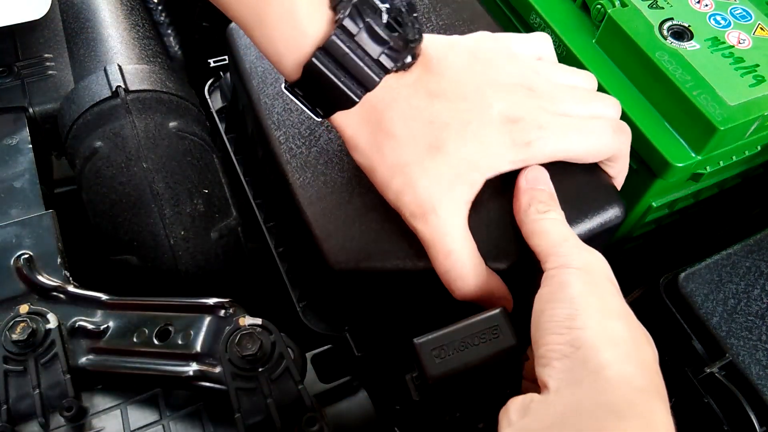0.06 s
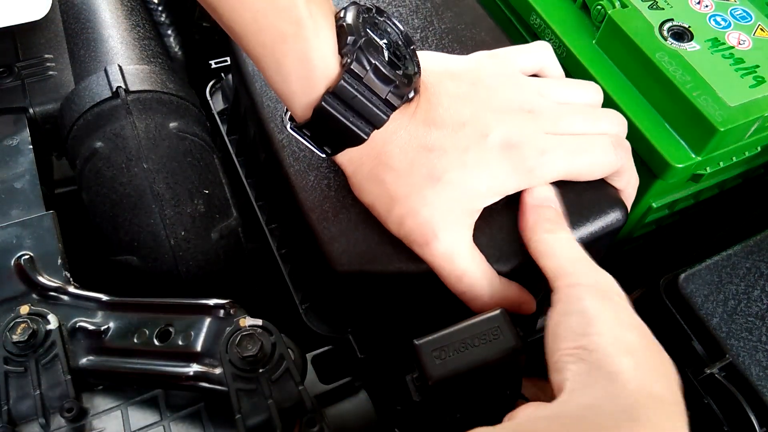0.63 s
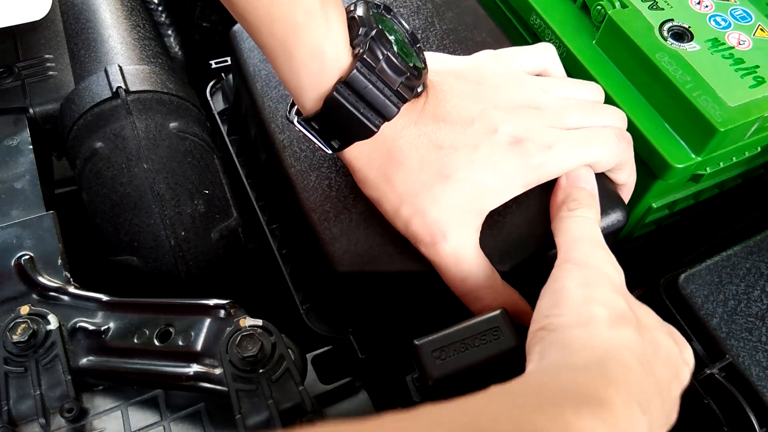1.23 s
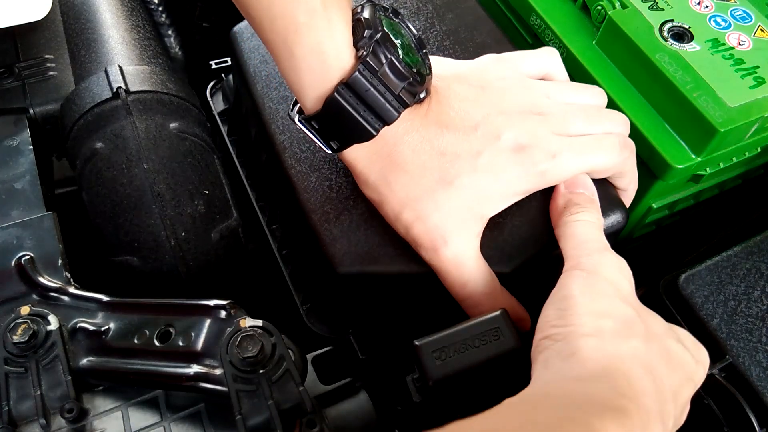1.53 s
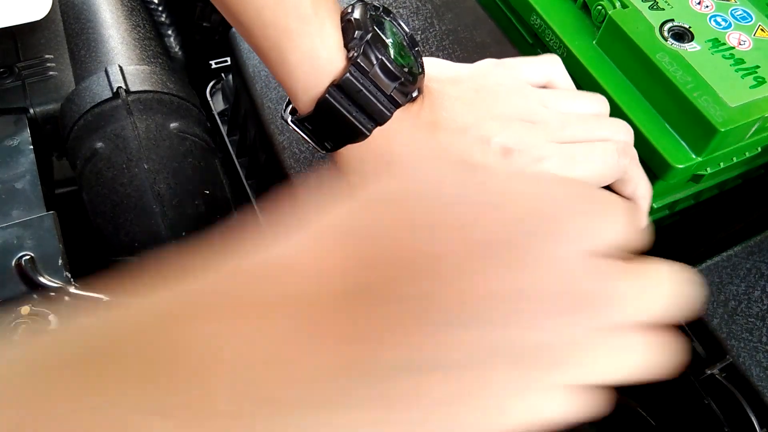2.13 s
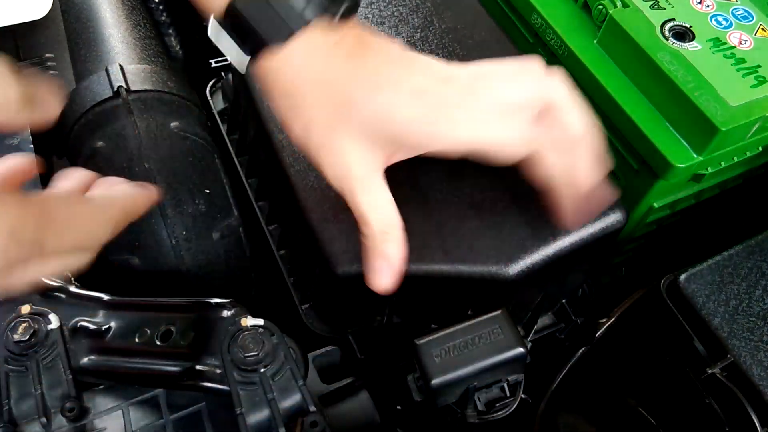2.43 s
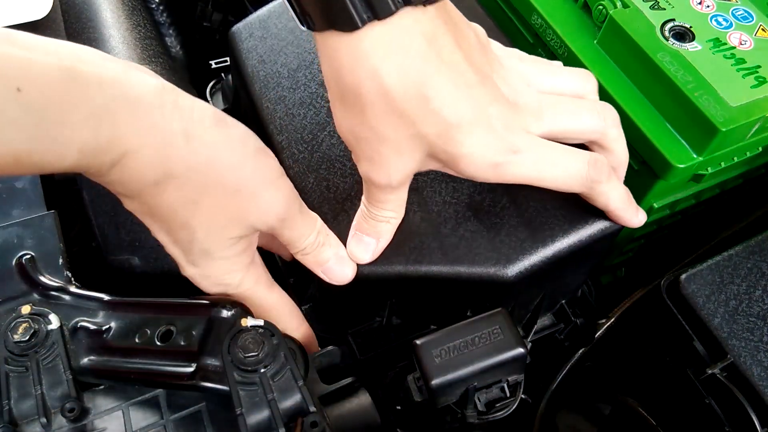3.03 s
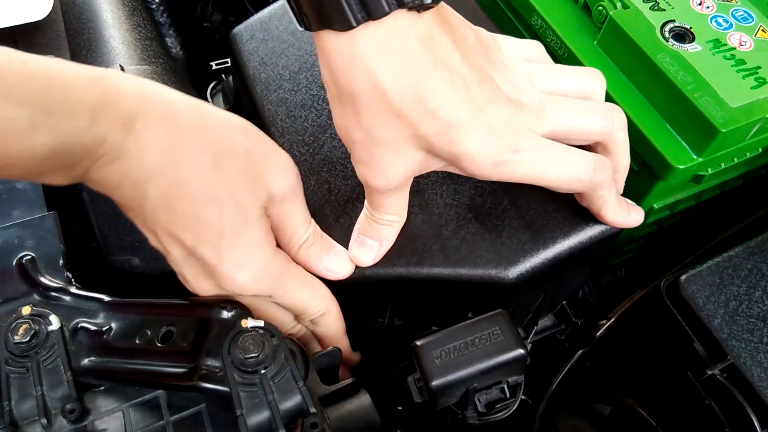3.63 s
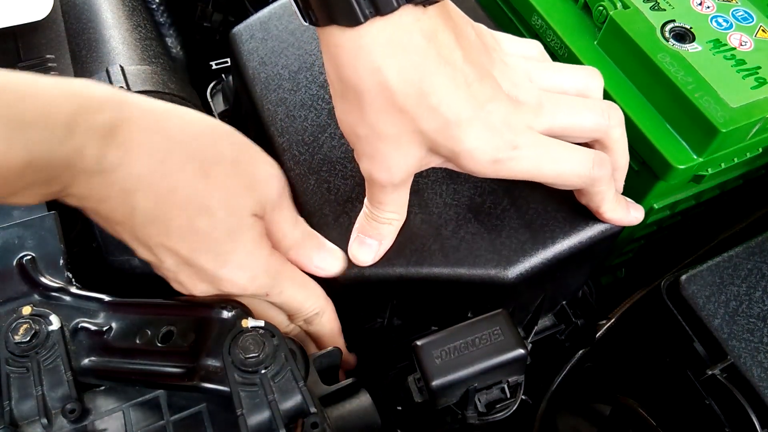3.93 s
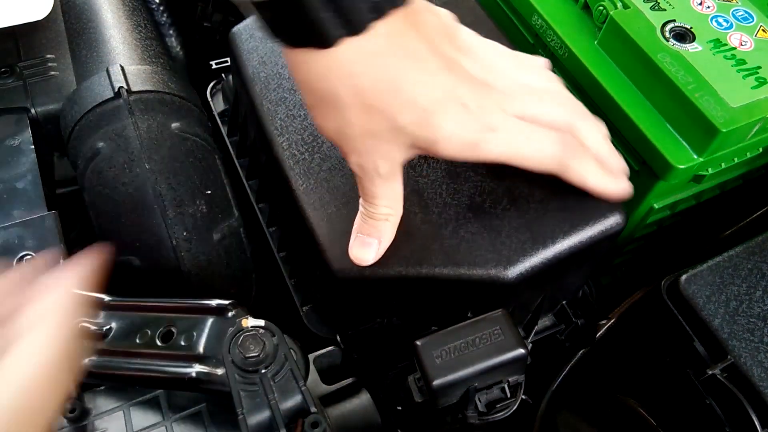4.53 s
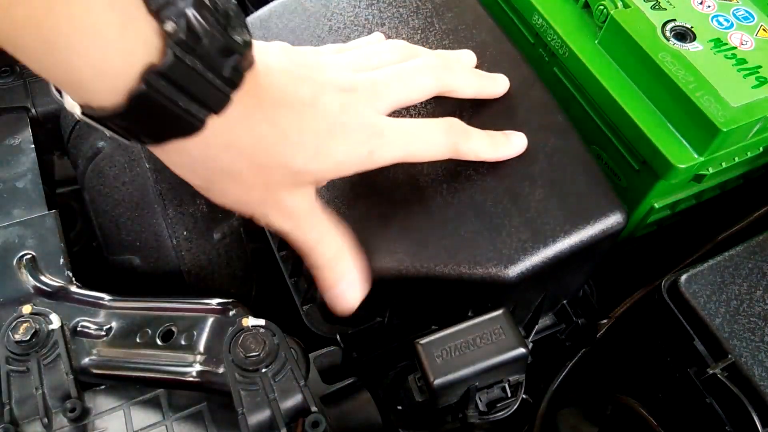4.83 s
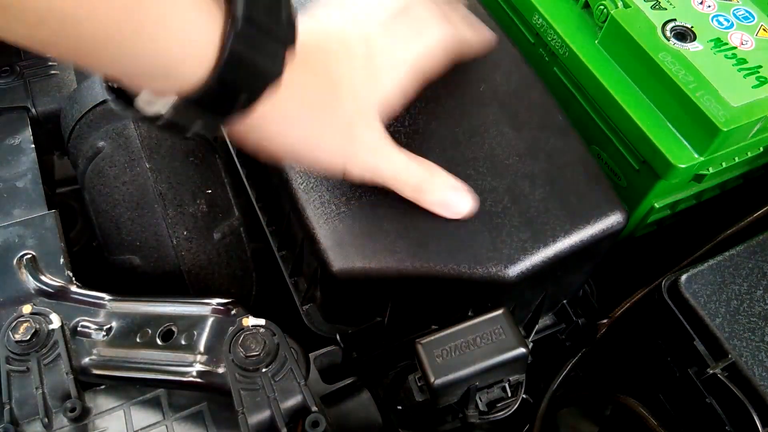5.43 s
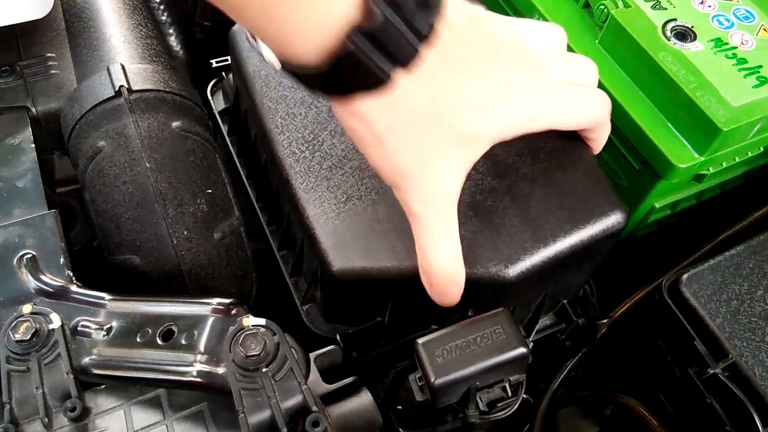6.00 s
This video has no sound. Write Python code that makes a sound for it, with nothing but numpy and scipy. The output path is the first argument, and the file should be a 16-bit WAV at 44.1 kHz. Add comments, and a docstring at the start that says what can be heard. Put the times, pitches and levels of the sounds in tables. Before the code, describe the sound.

A plastic air filter lid is pressed onto its box close to the microphone, in a sheltered parking place. Distant traffic hums quietly throughout, and faint birds whistle short gliding notes, mostly in the first half. Around 1 second the lid settles with a cluster of light knocks, a scrape and a tiny metallic ring. At about 1.8 seconds a steel spring clip snaps shut, loud and sharp, with a hollow plastic knock that slightly overloads and an echo cut short. A soft scrape and knock follow near 2.3 seconds, then a crisp click at 3.1. At 3.7 seconds the second clip snaps shut, just as loud. From about 4 to 4.4 seconds come faint scraping, light knocks and a brief, high twang of the clip. Palms hiss very faintly over the plastic now and then, and one soft tap comes near 6.2 seconds.

```python
"""A plastic air filter lid knocks and rings as two hands press it onto its box, close to a microphone.
Its two spring clips scrape over the rim, twang and snap shut, and palms hiss as they slide over it.
Birds whistle and traffic hums far off, beyond the sheltered parking place.
The two big snaps overload the recorder, whose noise gate cuts their echo short."""
import sys
import numpy as np
from scipy import signal
from scipy.fft import rfft, irfft, next_fast_len
from scipy.io import wavfile
from scipy.ndimage import uniform_filter1d, map_coordinates

SR = 44100
rng = np.random.default_rng(int(sys.argv[2]) if len(sys.argv) > 2 else 0)


def digitize_waveform(pressure):
    """Quantize a signal to 16-bit integers and store it at the path in sys.argv[1].

    Rows of a 2-D input are taken as channels; values are limited to [-1, 1].
    """
    field = np.atleast_2d(pressure).T
    bounded = np.clip(field, -1, 1)
    quanta = np.round(bounded * 32767).astype(np.int16)
    wavfile.write(sys.argv[1], SR, quanta)


N = 276049

# Levels are relative. t is the start time; t60 is the time a sound takes to fade by 60 dB.
# tone colour of far traffic: f/Hz, level/dB
TRAFFIC_COLOUR = [(15, -41.5), (25, -16), (59, -2), (209, -6), (349, -15.5), (421, -15.5), (598, -17.5),
                  (1140, -18.5), (1710, -26), (2560, -25), (3440, -31.5), (4260, -30.5), (5880, -34.5),
                  (9810, -34.5), (15500, -44.5)]
# tone colour of the microphone's own hiss: f/Hz, level/dB
HISS_COLOUR = [(3000, -25.5), (8500, -12), (9600, -3), (10600, -16), (15000, -18)]
# a hand slides over the lid: t/s, length/s, level/dB, flatness (0 fingertip, 1 whole palm)
HAND_STROKES = [(-.06, .41, -66, 0.73), (0.663, 0.33, -76, 0.33), (1.169, 0.195, -72.5, 0.23),
                (1.599, .14, -73.5, 0.44), (1.954, 0.4, -67, .35), (2.308, .24, -65, .9),
                (2.508, 0.12, -72, 0.95), (2.879, 0.281, -75.5, 0.76), (3.825, .36, -65.5, 0.42),
                (4.621, 0.384, -68.5, 0.67), (4.998, 0.2, -76.5, 0.62), (5.45, .17, -61.5, 0.99),
                (5.841, .11, -65.5, 0.81)]
# tone colour of skin rubbing plastic: f/Hz, level/dB
SKIN_COLOUR = [(300, -25), (900, -4), (2200, -0.5), (3500, -3), (4800, -6.5), (6200, -2), (7200, 1),
               (8300, -3.5), (9700, -8.5), (12500, -9.5), (16000, -23.5)]
# bird whistles: t/s, length/s, first f/Hz, last f/Hz, level/dB
BIRD_WHISTLES = [(0.205, .035, 2100, 2090, -55.5), (0.234, 0.043, 3170, 3220, -54),
                 (0.456, 0.33, 2768, 2747, -59.5), (0.506, .06, 6370, 6850, -56),
                 (0.877, 0.095, 2905, 3185, -63), (1.08, 0.054, 4450, 4150, -59),
                 (1.125, 0.086, 4100, 4025, -57.5), (1.149, 0.089, 3210, 3010, -61.5),
                 (1.228, 0.087, 2690, 2592, -56), (1.301, .15, 2520, 2137, -61),
                 (1.47, 0.1, 2143, 2494, -53), (1.485, 0.19, 3120, 3273, -56.5),
                 (1.69, .06, 3900, 3130, -49.5), (1.799, 0.083, 3112, 3060, -45),
                 (1.909, .16, 3190, 2697, -50), (2.208, .07, 3250, 3400, -51),
                 (2.275, 0.194, 4130, 4140, -51.5), (2.55, .2, 4200, 4190, -70),
                 (2.75, 0.14, 4310, 4700, -68.5), (3.507, 0.025, 5680, 5970, -47),
                 (3.522, 0.073, 5880, 3150, -53.5), (4.151, .27, 4230, 4190, -67.5),
                 (4.776, 0.076, 3660, 3060, -51.5), (5.199, 0.32, 2742, 2640, -62),
                 (6.02, .23, 4350, 4050, -66)]
# how long the street echoes: f/Hz, t60/s
STREET_DECAY = [(2000, 0.89), (8000, 0.27)]
# the tones (modes) of lid and box: f/Hz, t60/s, level/dB struck at clip one, level/dB at clip two
BOX_MODES = [(110, 0.044, -10.5, -22), (238.5, .11, -23, -15.5), (303.5, 0.11, -18, -17),
             (445.7, 0.098, -9, -10.5), (465, 0.11, -11, -9.5), (598, 0.056, -5.5, -5.5),
             (767, 0.064, -8.5, 1.5), (886.7, 0.067, -8, -4), (1033, .06, -7.5, -8.5),
             (1139, 0.061, -2, -12.5), (1223.6, 0.046, -6, -5), (1385, 0.046, -3.5, -8),
             (1521, 0.038, -13, -7.5), (1813.4, 0.026, -2, 6), (2100, .06, -11, -8.5),
             (2314, 0.056, -9, -5.5), (2454, 0.046, -16.5, -2.5), (2550, 0.092, -18, -8),
             (2962, 0.04, -16, -10.5), (3260, .05, -14.5, -19.5), (5090, 0.047, -31.5, -18),
             (6640, 0.047, -25, -25), (7280, 0.057, -26, -20.5), (8770, 0.022, -18, -21.5)]
# thud, knock, clack and crack: low f/Hz, high f/Hz, t60/s of noisy ringing, its level/dB against the modes
BLOW_BANDS = [(44.4, 400, 0.2, -5), (369.9, 1400, 0.09, -6.5), (1495, 3500, 0.035, -3.5),
              (3470, 12000, 0.036, 1.5)]
# tone colour of that noisy ringing: f/Hz, level/dB
BLOW_COLOUR = [(45, 1), (110, 3.5), (175, -6), (260, 1), (700, 3.5), (1000, 0.5), (2000, -2.5),
               (3200, -7.5), (4200, -8.5), (5200, -7), (6000, -7.5), (7800, -6), (10500, -16),
               (15000, -26.5)]
# how long the shelter echoes: f/Hz, t60/s
SHELTER_DECAY = [(100, 0.27), (600, 0.38), (2500, 0.34), (8000, 0.26), (15000, 0.25)]
# light knocks of lid, clips and fingers:
# t/s, level/dB, thud/dB, hardness/dB, place (0 clip one, 1 clip two), share of the full ring time
LID_KNOCKS = [(.875, -69, -5, 22, .55, 1), (.9524, -44.5, 1, 11, 0, .95),
              (0.9776, -35, -9.5, 0, 0.27, 0.97), (1.015, -39, -2.5, -5, 0.7, 0.32),
              (1.023, -40, -1.5, -16, 0.2, 0.04), (2.338, -53, -20, 12, .91, 0.7),
              (2.3476, -40, -4.5, 2.5, .95, 1), (4.141, -39, -11, -4.5, 1, 0.37),
              (4.3025, -35.5, -8.5, -3, 0.19, 1), (4.319, -42.5, -3, -7, 0.19, .9),
              (6.15, -55, 3, 4.5, 0.7, 1)]
# a clip snaps over the rim: t/s, level/dB, thud/dB, hardness/dB, place, ring share, tick/dB, echo/dB
CLIP_SNAPS = [(1.7525, -7, -12.5, -1.5, 0.1, .95, -23.5, -14.5),
              (3.1449, -25.5, -14, 2.5, 0.86, 0.75, -1.5, -13),
              (3.6858, -4.5, -13, -3, 0.96, .92, -24, -19)]
# clips and fingers scrape the rim: t/s, length/s, level/dB, low f/Hz, high f/Hz
RIM_SCRAPES = [(.955, 0.0082, -44, 300, 12000), (0.981, 0.034, -45.5, 500, 13200),
               (2.232, 0.067, -51, 600, 11950), (3.926, 0.12, -60, 452, 900),
               (4.172, 0.188, -59.5, 499, 1820), (4.311, 0.042, -49.5, 4100, 14000)]
# tone colour of the scraped rim: f/Hz, level/dB
RIM_COLOUR = [(200, -20), (1200, 6), (3000, 6.5), (4500, -10), (7000, 3), (8300, -6), (10000, -3),
              (13000, -13), (16000, -20)]
# a steel clip twangs: t/s, level/dB
CLIP_TWANGS = [(0.992, -44.5), (4.3046, -30.5)]
# the tones of that clip: f/Hz, level/dB, t60/s
CLIP_MODES = [(6820, 2, 0.043), (7240, -10, 0.034), (9410, -10, 0.056)]


def amp(db):
    return 10 ** (np.asarray(db) / 20)


def unit(x):
    """Scale a sound to an average (rms) level of 1."""
    return x / np.sqrt(np.mean(x ** 2) + 1e-20)


def along(points, hz):
    """Read between (f/Hz, value) points on a log frequency axis."""
    f, v = np.transpose(points)
    return np.interp(np.log(hz + 1), np.log(f + 1), v)


def wobble(rate, size):
    """A smooth random curve through `rate` points a second."""
    points = rng.standard_normal(int(size * rate / SR) + 4)
    return map_coordinates(points, [np.arange(size) * rate / SR])


def noise(colour, size):
    """Noise of level 1 with the given tone colour."""
    m = next_fast_len(size)
    gains = amp(along(colour, np.fft.rfftfreq(m, 1 / SR)))
    return unit(irfft(rfft(rng.standard_normal(m)) * gains, m)[:size])


def bandpass(x, low_hz, high_hz, order=3):
    return signal.sosfilt(signal.butter(order, [low_hz, high_hz], "band", fs=SR, output="sos"), x)


def add(track, s, sound):
    """Mix a sound into the track from time s on."""
    part = track[max(round(s * SR), 0):][:len(sound)]
    part += sound[:len(part)]


def fade(t, t60):
    return np.exp(-np.log(1000) * t / t60)


def echo(x, decay, build_s):
    """Walls send back a blurred tail in which each frequency dies at its own speed."""
    hz, t, spectrum = signal.stft(rng.standard_normal(SR // 2), SR, nperseg=256)
    tail = signal.istft(spectrum * fade(t, along(decay, hz)[:, None]), SR, nperseg=256)[1]
    tail *= 1 - np.exp(-np.arange(len(tail)) / SR / build_s)
    return signal.fftconvolve(x, tail / np.linalg.norm(tail))[:len(x)]


def traffic_and_hiss():
    """Far traffic drifts a little in level over the microphone's own steady hiss."""
    drift = amp(-51.5 + 0.82 * wobble(5.4, N))
    traffic = drift * bandpass(noise(TRAFFIC_COLOUR, N), 44, 20000)
    return traffic + amp(-69) * noise(HISS_COLOUR, N)


def palms(fingertip_hz=(4740, 8500)):
    """Skin on grained plastic hisses unevenly: a thin sound under a fingertip, a full one under the palm."""
    track = np.zeros(N)
    for s, length, db, flatness in HAND_STROKES:
        size = round(length * SR)
        palm = noise(SKIN_COLOUR, size)
        fingertip = unit(bandpass(noise(SKIN_COLOUR, size), *fingertip_hz, order=2))
        hiss = flatness * palm + (1 - flatness) * fingertip
        grain = amp(3 * wobble(700, size) + 1.6 * wobble(50, size))
        swell = signal.windows.tukey(size, 0.71)  # the hand speeds up, then slows down
        stroke = amp(db + 11) * swell * unit(hiss * grain)
        add(track, s, stroke[max(round(-s * SR), 0):])
    return track


def birds(waver=0.013, flutter_db=2.5):
    """Far birds whistle gliding notes, which the walls of the street smear."""
    track = np.zeros(N)
    for s, length, first_hz, last_hz, db in BIRD_WHISTLES:
        size = round(length * SR)
        progress = np.linspace(0, 1, size)
        glide = last_hz + (first_hz - last_hz) * (1 - progress) ** 2.5  # fast at first, then settling
        pitch = glide * (1 + waver * wobble(200, size))
        swell = signal.windows.tukey(size, 0.45) * amp(db + flutter_db * wobble(25, size))
        add(track, s, swell * np.sin(2 * np.pi * np.cumsum(pitch) / SR))
    return amp(-3) * track + amp(-2.5) * echo(track, STREET_DECAY, build_s=0.0058)


def unit_onset(x):
    """Scale a sound so that its first 10 ms have level 1."""
    return x / np.sqrt(np.mean(x[:SR // 100] ** 2))


def blow(levels_db, place, ring_share, attack_s, scatter_db, noisy_db):
    """The struck box rings with clear tones and a noisy blur; a pressing hand shortens both."""
    t = np.arange(SR // 3) / SR
    hz, t60, first_db, second_db = np.transpose(BOX_MODES)[:, :, None]
    place_db = first_db + place * (second_db - first_db)  # each spot favours different tones
    strength = amp(place_db + scatter_db * rng.standard_normal(hz.shape))
    sign = np.cos(np.pi * np.arange(len(hz)))[:, None]  # neighbouring modes swing opposite ways
    modes = np.sum(sign * strength * fade(t, t60 * ring_share) * np.sin(2 * np.pi * hz * t), axis=0)
    rise = 1 - np.exp(-t / attack_s)
    impact = 1 + 1.5 * fade(t, 0.005)  # the first instant comes straight from the struck spot
    sound = np.zeros(len(t))
    for db, (low_hz, high_hz, blur_t60, blur_db) in zip(levels_db, BLOW_BANDS):
        tones = unit_onset(bandpass(modes * rise, low_hz, high_hz))
        burst = noise(BLOW_COLOUR, len(t)) * fade(t, blur_t60 * ring_share) * impact * rise
        blur = unit_onset(bandpass(burst, low_hz, high_hz))
        sound += amp(db) * unit_onset(tones + amp(blur_db + noisy_db) * blur)
    return sound


def contact(db, thud_db, hardness_db, place, ring_share, echo_db):
    """A blow, brighter when harder, and its echo, which gathers sound from all sides and so rings less."""
    clack_db, crack_db = 0.7 * hardness_db - 1, hardness_db - 10.5
    levels_db = db + np.array([thud_db, 0, clack_db, crack_db])
    direct = blow(levels_db, place, ring_share, attack_s=0.0003, scatter_db=1.84, noisy_db=0)
    all_round_db = levels_db + [6.5, -0.5, -3.5, -0.5]
    all_round = blow(all_round_db, place, ring_share, attack_s=0.0005, scatter_db=1.5, noisy_db=11)
    return direct + amp(echo_db) * echo(all_round, SHELTER_DECAY, build_s=0.0051)


def knocks():
    """Lid, clips and fingers knock lightly as the lid settles onto the box."""
    track = np.zeros(N)
    for s, *touch in LID_KNOCKS:
        add(track, s, contact(*touch, echo_db=-12.5))
    return track


def scrapes():
    """An edge grinds over the rim in tiny uneven slips; a hard edge sounds higher than a fingertip."""
    track = np.zeros(N)
    for s, length, db, low_hz, high_hz in RIM_SCRAPES:
        size = round(length * SR)
        slips = noise(RIM_COLOUR, size) * amp(2.1 * wobble(600, size))
        grit = unit(bandpass(slips, low_hz, high_hz, order=2))
        add(track, s, amp(db) * signal.windows.tukey(size, 0.4) * grit)
    return track + amp(-5.5) * echo(track, SHELTER_DECAY, build_s=0.008)


def twangs():
    """The steel clip rings briefly as a finger lets go of it."""
    track, t = np.zeros(N), np.arange(SR // 4) / SR
    ring = sum(amp(db) * fade(t, t60) * np.sin(2 * np.pi * hz * t) for hz, db, t60 in CLIP_MODES)
    rise = 1 - np.exp(-t / 0.0008)
    for s, db in CLIP_TWANGS:
        add(track, s, amp(db) * ring * rise)
    return track + amp(-22) * echo(track, SHELTER_DECAY, build_s=0.00803)


def snaps(tick_lead_s=0.0016, tick_ring_share=0.18):
    """A clip slips off its ridge with a tick, then lands and sets the box ringing."""
    track = np.zeros(N)
    for s, db, thud_db, hardness_db, place, ring_share, tick_db, echo_db in CLIP_SNAPS:
        tick = contact(db + tick_db, thud_db, hardness_db, place, tick_ring_share, echo_db)
        add(track, s - tick_lead_s, tick)
        add(track, s, contact(db, thud_db, hardness_db, place, ring_share, echo_db))
    return track


def scene():
    """All the sounds together, in one channel."""
    lid = knocks() + snaps() + scrapes() + twangs()
    return (lid + palms() + birds() + traffic_and_hiss())[None]


def noise_gate(x, open_db=-37, knee_db=5, depth_db=10.5, window_s=0.027, glide_s=0.029):
    """Turn the sound down smoothly whenever its level falls under open_db."""
    power = uniform_filter1d(x ** 2, int(window_s * SR))
    level_db = 10 * np.log10(np.abs(power) + 1e-12)
    closed = np.clip((open_db - level_db) / knee_db, 0, 1)
    return x * amp(-depth_db * uniform_filter1d(closed, int(glide_s * SR)))


def record(dry):
    """The recorder turns quiet parts down, flattens peaks that overload it and drops the top treble."""
    clipped = np.clip(noise_gate(dry), -1, 1)
    m = next_fast_len(N + SR // 2)
    passband = np.fft.rfftfreq(m, 1 / SR) < 15750
    return irfft(rfft(clipped, m) * passband, m)[..., :N]


dry = scene()
out = record(dry)
digitize_waveform(out)
```